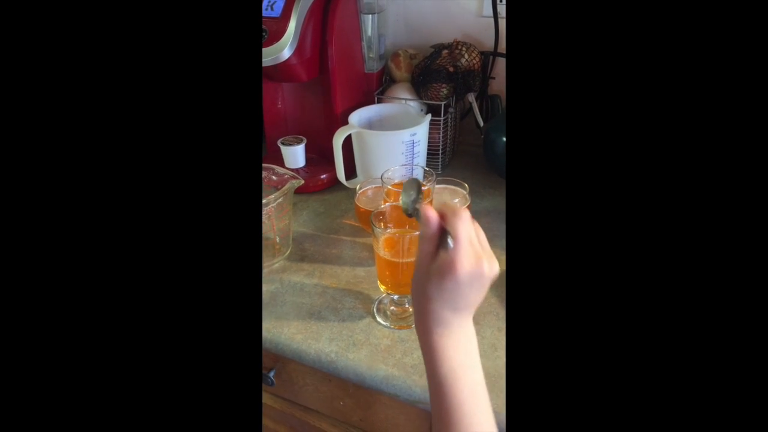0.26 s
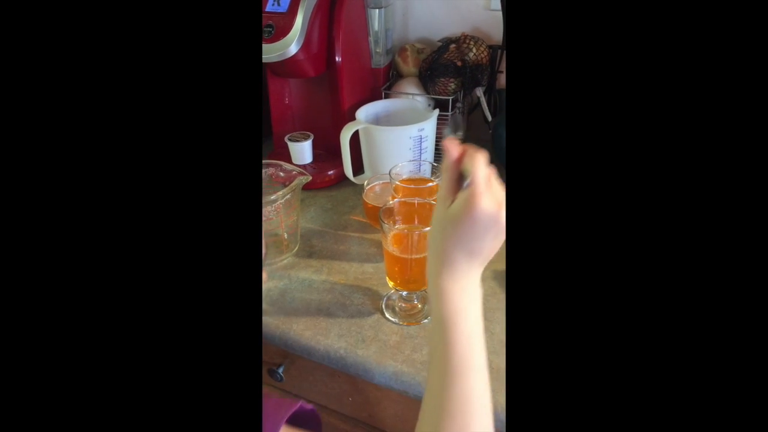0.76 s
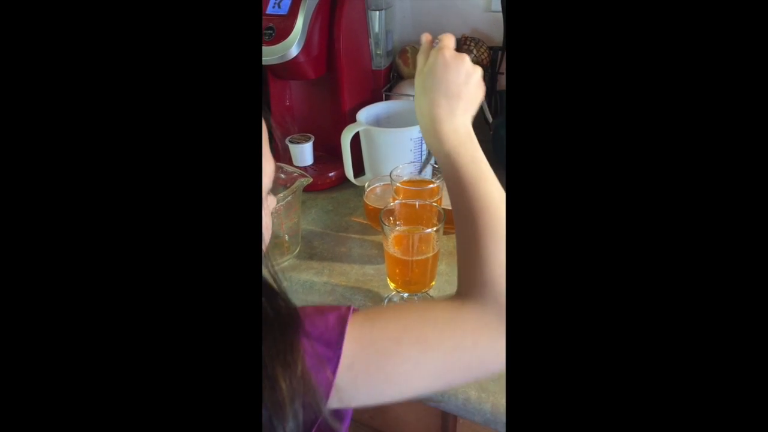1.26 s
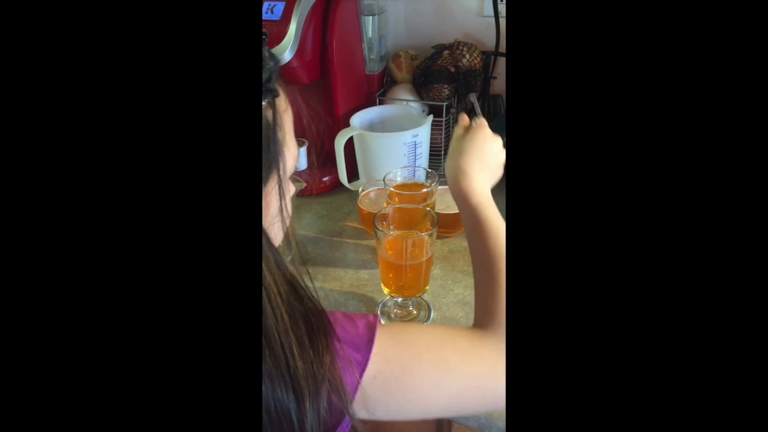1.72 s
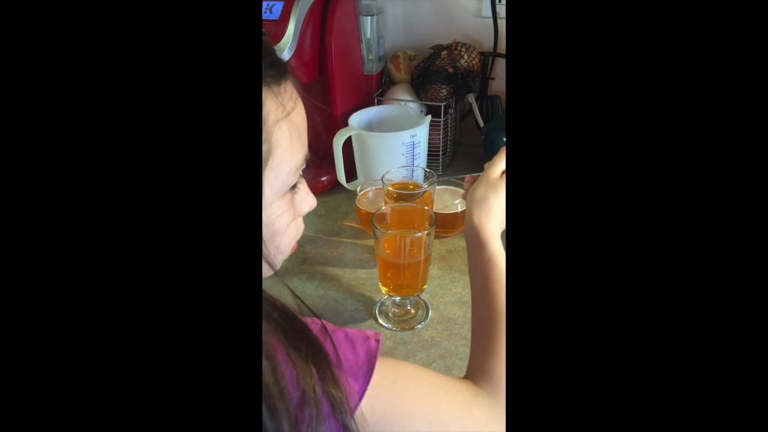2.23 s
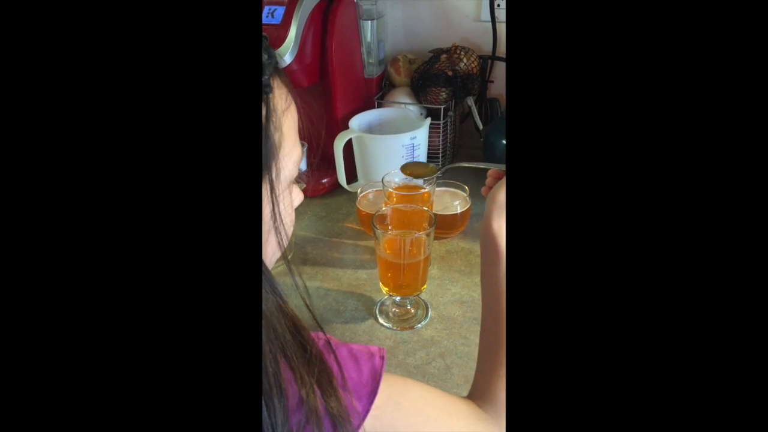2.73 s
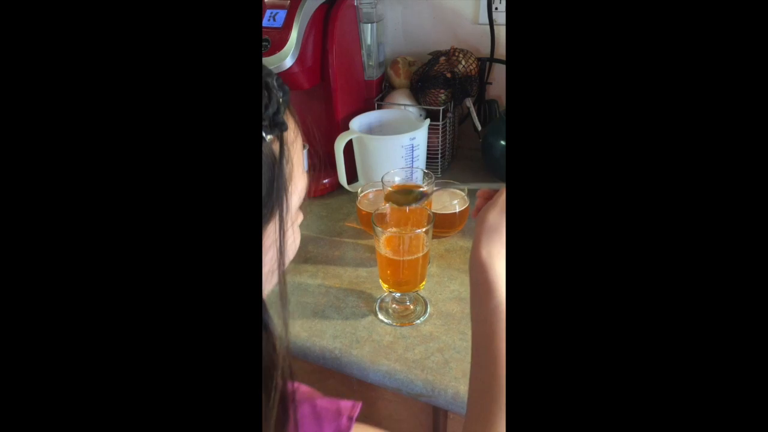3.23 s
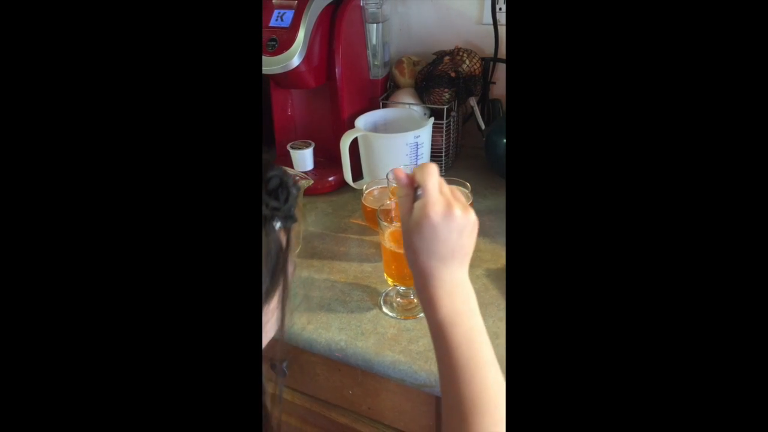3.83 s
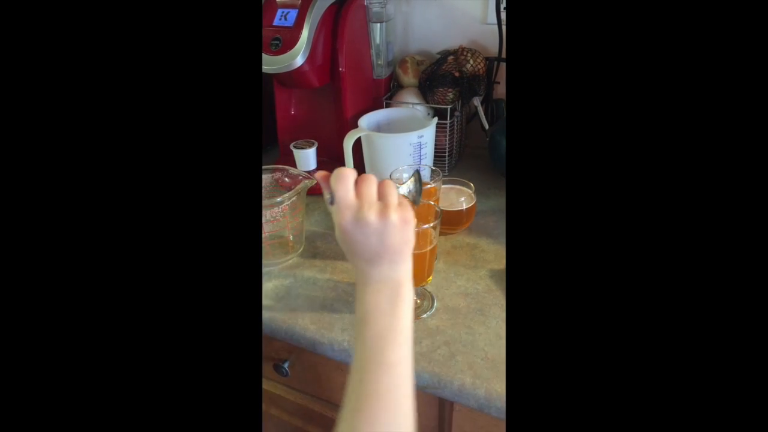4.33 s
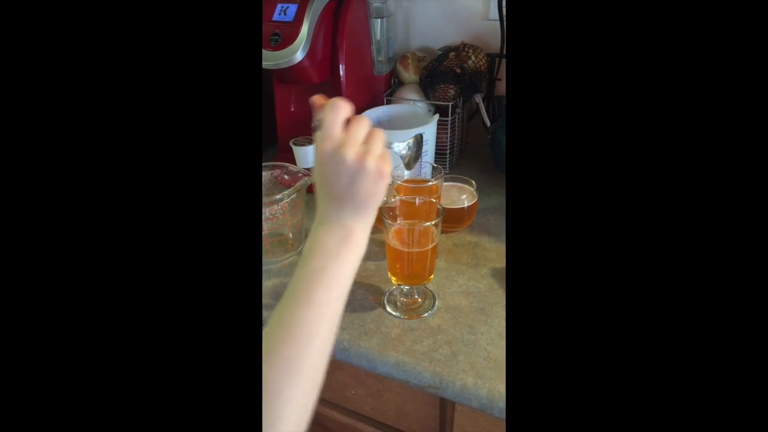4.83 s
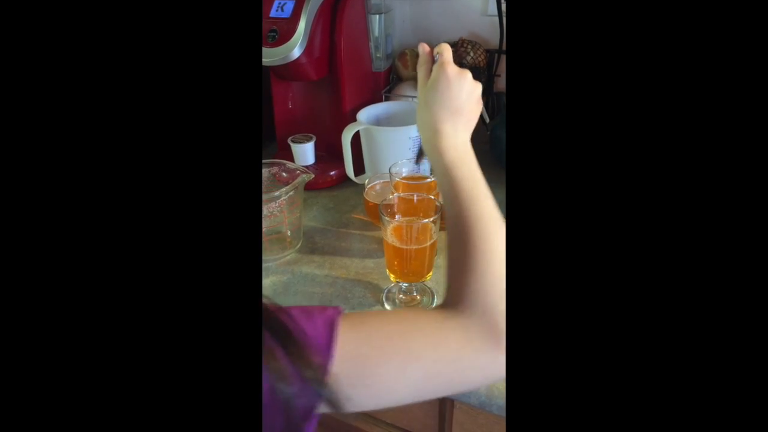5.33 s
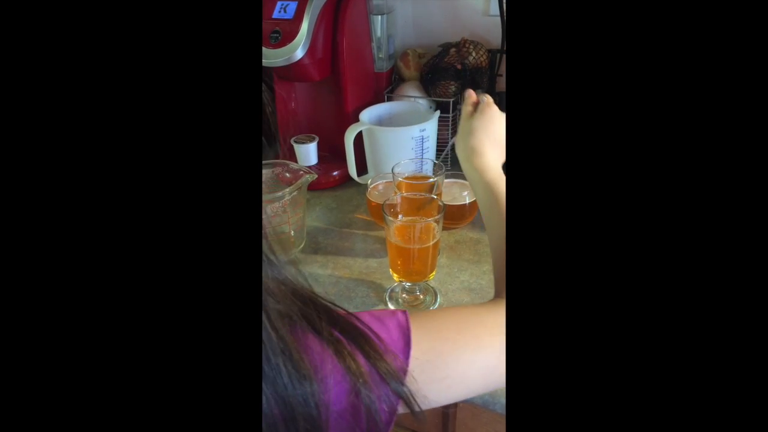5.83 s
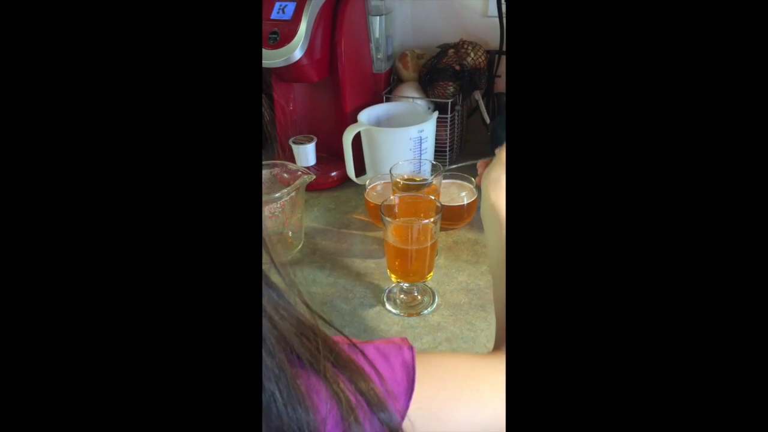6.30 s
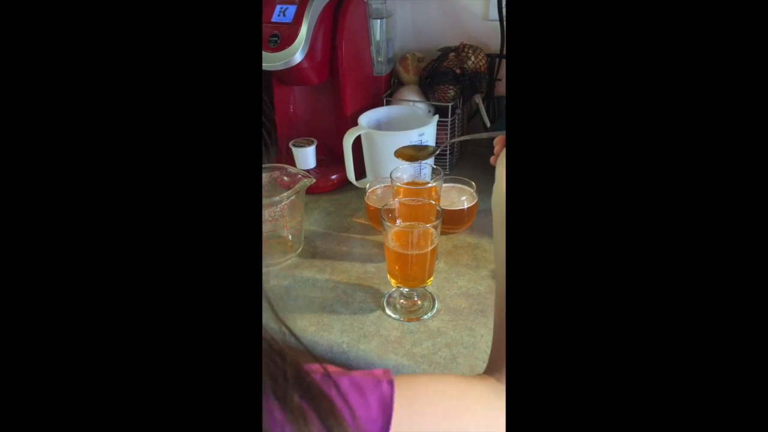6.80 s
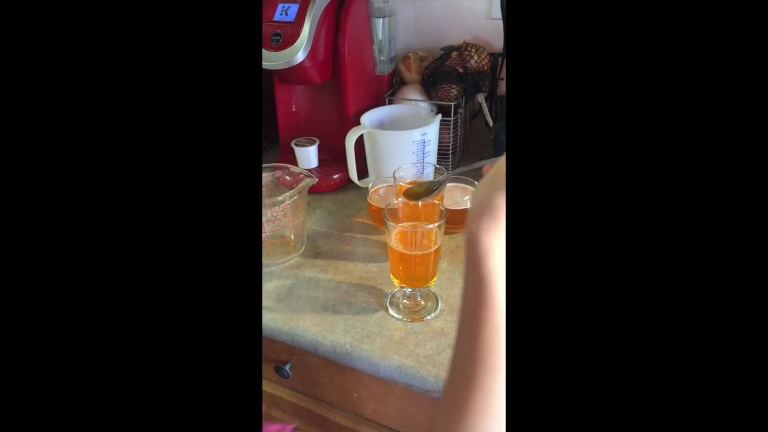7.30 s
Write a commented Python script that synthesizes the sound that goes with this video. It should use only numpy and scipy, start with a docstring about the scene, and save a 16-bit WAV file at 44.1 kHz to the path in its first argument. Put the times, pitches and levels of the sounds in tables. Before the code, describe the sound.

A metal spoon clinks in two bright, short bursts against glass goblets, with tiny liquid plips, a knock and low microphone-handling thumps in a quiet kitchen.

```python
"""Spoon in glass goblets of dessert

A metal spoon clinks on glass goblets of liquid dessert: noisy clacks excite short resonances, and
decaying sines ring as glass and spoon. Random slips rasp along the glass, short sines plip as bubbles,
a faint rim ring and a knock, and dull clacks slap the liquid. An arm brushes the counter, and the hand
that holds the microphone adds sagging low thumps and rumble over the shaped-noise hiss of a quiet,
small kitchen."""
import sys
import numpy as np
from scipy import signal
from scipy.fft import rfft, irfft
from scipy.io import wavfile

SR = 44100
rng = np.random.default_rng(int(sys.argv[2]) if len(sys.argv) > 2 else 0)


def store_pcm(level_fs):
    """Save levels as 16-bit WAV."""
    pcm = np.round(np.clip(level_fs, -1, 1) * 32767).astype(np.int16)
    wavfile.write(sys.argv[1], SR, np.atleast_2d(pcm).T)


N = 333162
TIME = np.arange(N) / SR   # scene clock [s]
AGE = np.arange(int(0.6 * SR)) / SR   # time since the start of one event [s]

# Spoon against the goblet wall: (time [s], ring level [dB], detuning [Hz], ring tilt [dB per octave],
# ring length [factor], clack level [dB], contact edge [Hz])
CLINKS = [ (1.509, -36, 8, 1.5, 0.87, -40, 17000), (1.59, -46.5, -50.5, -6, 1.47, -45.5, 9300),
          (1.701, -44.5, -60, -2.5, 0.4, -53, 3500), (1.922, -59.5, 77, 11.5, .68, -48.5, 3940),
          (1.983, -40.5, 1, -8, 1.73, -31.5, 5300), (2.235, -49.5, -20.5, .5, 0.47, -55.5, 2860),
          (2.513, -63, 20.5, 2, 0.84, -74, 3000), (5.643, -32.5, 42, -3, 0.8, -46, 12200),
          (5.685, -43, 79.5, -0.5, 0.77, -57.5, 6800), (5.750, -48, 32, -4, 0.38, -55.5, 7900),
          (6.054, -39, -1.5, -6, 1.02, -54, 3900), (6.118, -34.5, 3, -8.5, 0.35, -47, 6000),
          (6.256, -50, 20, -20, 2.23, -48.5, 3050), (6.446, -33.5, 5, 0, 0.76, -43, 4450)]
# Goblet damped by the spoon, lowest mode first: (frequency [Hz], level [dB], t60 at ring length 1 [s])
WALL_MODES = [(1625, -2.5, 0.17), (1730, -40, 0.039), (3279, -14.5, 0.18), (3417, 1, 0.13),
              (4310, -22, 0.17), (5720, -33.5, 0.18), (6330, -24, 0.24), (7870, -21, 0.092),
              (8750, -16.5, 0.26), (11450, -26.5, 0.088), (12400, -29, 0.068), (13300, -46, 0.029)]
# The spoon's own ring, damped by the hand: (frequency [Hz], level [dB], t60 [s])
SPOON_MODES = [(373, -13, 0.085), (609.5, -9.5, 0.064), (717, -7, 0.067), (959, 0.5, 0.063),
               (1420, -13, .11), (1980, 9, 0.041), (2000, -3.5, 0.17), (2223, -4, 0.03),
               (2630, -23.5, 0.12), (3430, 1, 0.067), (3680, -17, 0.048), (4550, -17, 0.14),
               (5730, -19, 0.13)]
# Spoon, stem and counter, crowded and short: (frequency [Hz], width [Hz], level [dB])
CLACK_BODY = [(359, 110, -7), (640, 142, -4), (806, 135, 4), (878, 182, 0.5), (1398, 690, 0.5),
              (1716, 312, 7), (2032, 94, 4.5), (2527, 320, -3), (3010, 98, -11.5), (3450, 102, 7),
              (3980, 1180, -12), (5776, 210, -0.5), (7030, 1500, -16), (9020, 580, -12), (13670, 930, -17)]
# Rim rings that go on freely: the first already sounding as the scene begins, the rest left by light # touches:
# (time [s], ring level [dB], ring tilt [dB per octave], clack level [dB], contact edge [Hz])
PINGS = [(0.0, -60, -9.5, -76, 2000), (3.738, -36, -0.5, -44, 8900), (3.803, -53, 3.5, -45, 7840),
         (4.029, -77, -18, -63.5, 2940)]
# Free rim: (frequency [Hz], level [dB], t60 [s])
RIM_MODES = [(1779, -2.5, 0.51), (1850, -13, 0.4), (3857, -2.5, 0.17), (6330, -18.5, 0.19),
             (7500, -36, 0.092), (9550, -18, 0.1), (13550, -37, 0.08)]
# Rim while the spoon still touches it: (frequency [Hz], width [Hz], level [dB])
PING_BODY = [(685, 360, -5.5), (1480, 480, -4), (1825, 174, 5.5), (4010, 166, -5), (6500, 360, -9.5),
             (7500, 430, -18), (9600, 230, -7), (13800, 1300, -40)]
UPPER_DETUNING = 0.7   # share of the detuning that the upper modes follow
SPOON_RING_DB = -6   # relative to the clack

# Spoon dragged along the glass: (time [s], length [s], rasp level [dB], singing rim level [dB])
SCRAPES = [(0.467, 0.33, -90, -74), (0.661, 0.27, -73, -78), (2.06, .24, -62, -78), (2.37, 0.11, -75, -88)]
# Goblet and spoon while they rub together: (frequency [Hz], width [Hz], level [dB])
SCRAPE_BODY = [(766, 150, -1.5), (1336, 110, -5.5), (1530, 18, 7), (1940, 90, 2), (3590, 76, -3)]
# The rim's note while it is rubbed: (frequency [Hz], width [Hz], level [dB])
SINGING_RIM = [(1712, 27, 0)]
# The spoon's edge catches and rings: (time [s], level [dB])
CATCHES = [(2.103, -62), (2.150, -56.5), (2.176, -58.5), (2.241, -53)]
SCRAPE_SKEW = 0.56   # under 1, a stroke swells faster than it fades

# Short plips and knock tones: bubbles, a faint rim ring (1800 Hz), and a knock at 7.41 s:
# (time [s], level [dB], pitch [Hz], life before it is cut off [s])
PLIPS = [(1.526, -50, 372, 0.019), (2.125, -53, 686, 0.05), (2.188, -51.5, 795, 0.048),
         (2.290, -62.5, 470, 0.057), (2.492, -59, 904, 0.041), (3.341, -34.5, 1930, 0.0043),
         (3.368, -23.5, 1590, 0.0093), (3.372, -49, 1800, 0.065), (3.462, -62, 1363, 0.045),
         (3.720, -36.5, 1280, .006), (3.721, -34.5, 1530, 0.0043), (5.683, -52, 953, 0.018),
         (6.258, -40, 824, 0.0073), (6.295, -55.5, 914, 0.18), (7.295, -58, 1360, 0.017),
         (7.414, -25.5, 1256, .001), (7.4145, -35, 1550, 0.0063), (7.415, -49, 3590, 0.0043),
         (7.416, -38.5, 1077, 0.038), (7.428, -53.5, 897, 0.028)]
# The spoon slaps into the liquid: (time [s], level [dB], contact edge [Hz])
SLAPS = [(3.369, -52.5, 1390), (3.719, -52.5, 1478), (7.310, -65, 990), (7.414, -45.5, 1450)]
PLIP_CYCLES = 235   # a tone left uncut would fall by 60 dB in this many cycles

# Arm and cloth brushing the counter: (time [s], level [dB])
BRUSHES = [(.38, -74), (1.87, -65), (6.67, -75), (6.93, -74.5), (7.24, -67), (7.47, -73)]
# Colour of the brushing, before scaling to unit rms: (frequency [Hz], level [dB per Hz])
BRUSH_COLOUR = [(100, -19), (220, -3.5), (330, -3.5), (450, -2.5), (620, -9.5), (1150, -14.5),
                (2000, -21.5), (5000, -50)]
BRUSH_ATTACK_S, BRUSH_FADE_DB_PER_S = 0.049, 29

# Fingers shifting on the microphone's case: (time [s], peak level [dB], starting pitch [Hz])
THUMPS = [(.347, -38.5, 272), (.353, -36.5, 122), (0.443, -45, 104), (.562, -36, 113), (0.679, -39, 204),
          (0.706, -37, 123), (.742, -38.5, 98), (1.255, -34.5, 206), (1.276, -30, 131), (1.39, -40.5, 126),
          (1.437, -42.5, 270), (1.448, -36, 120), (1.463, -41, 208), (1.74, -41, 254), (2.808, -48, 242),
          (2.874, -52.5, 104), (3.643, -49.5, 132), (3.687, -45, 129), (3.861, -45, 273), (4.455, -41, 166),
          (4.502, -41, 203), (4.846, -50.5, 235), (5.053, -52.5, 105), (5.441, -40, 163),
          (5.575, -43.5, 283), (5.586, -38.5, 120), (6.346, -32, 153), (6.701, -36, 161),
          (6.736, -43.5, 161), (7.275, -55.5, 243)]
# Rumble of the holding hand, before GRIP_LIFT_DB: (time [s], level [dB])
GRIP = [(0.0, -67.5), (0.67, -69), (1.01, -67.5), (1.26, -63.5), (2.44, -73.5), (5.49, -73), (6.45, -67.5),
        (7.55, -76)]
# Colour of the rumble, before scaling to unit rms: (frequency [Hz], level [dB per Hz])
GRIP_COLOUR = [(25, -30), (45, -0.5), (70, 2.5), (120, -5), (200, -16), (400, -30), (800, -62.5)]
THUMP_PEAK_CYCLES = 1.36   # cycles of the starting pitch until a thump peaks
STIR_DB, STIR_S = -23.5, 0.044   # rumble around each thump: level under its peak, spread in time
GRIP_LIFT_DB = 3.0
GRIP_WANDER_DB, GRIP_WANDERS_PER_S = 3.5, 12   # the rumble swells and sinks at random

# Colour of the hiss, before scaling to unit rms: (frequency [Hz], level [dB per Hz])
HISS = [(150, -13.5), (250, -5.5), (420, -8.5), (700, -8), (1400, -6.5), (2000, -6.5), (3100, -7.5),
        (4000, -14.5), (4750, -19), (5300, -16), (7500, -20.5), (10400, -24), (14800, -24.5), (15500, -41)]
HISS_DB = -73

# Counter, jug and backsplash: (delay [s], strength [gain])
ECHOES = [(.0031, 0.1), (.0068, 0.62), (0.011, 0.2)]
# Decay of the room: (frequency [Hz], t60 [s])
ROOM_T60 = [(200, .3), (1500, 0.23), (4000, 0.18), (12000, 0.22)]
# Round trips between the walls: (shortest [s], longest [s])
ROOM_DELAYS_S = (.007, .037)

MIC_LOW_CUT_HZ, CUTOFF_HZ = 23, 15600


def spoon_on_glass():
    """Clinks under a pressing spoon, which detunes and damps the wall, and pings of a free rim."""
    return clinks() + pings()


def clinks(ring_reach=1.32, choke_s=0.003):
    """Each blow is a clack and a ring; a soft contact dulls both."""
    out = np.zeros(N)
    next_touches = [row[0] for row in CLINKS[1:]] + [N / SR]
    for row, next_s in zip(CLINKS, next_touches):
        s, ring_db, detuning_hz, tilt_db, length, clack_db, edge_hz = row
        free = (1 - np.tanh((s + AGE - next_s) / choke_s)) / 2   # the next touch chokes the wall
        upper_hz = UPPER_DETUNING * detuning_hz
        wall = struck(WALL_MODES, s, tilt_db, length, detuning_hz, upper_hz)
        spoon = struck(SPOON_MODES, s)
        ring = from_db(ring_db) * wall * free + from_db(clack_db + SPOON_RING_DB) * spoon
        for _ in range(2):
            ring = lowpass(ring, ring_reach * edge_hz)
        add(out, s, ring + from_db(clack_db) * clack(edge_hz))
    return out


def pings():
    """A light touch makes a small clack and lets the rim ring on undamped."""
    out = np.zeros(N)
    for s, ring_db, tilt_db, clack_db, edge_hz in PINGS:
        rim = from_db(ring_db) * struck(RIM_MODES, s, tilt_db, waver=0.003)
        add(out, s, rim + from_db(clack_db) * clack(edge_hz, PING_BODY))
    return out


def struck(modes, s, tilt_db=0, length=1, low_shift_hz=0, upper_shift_hz=0,
           rise_s=0.0016, waver=0.0031, waver_hz=70):
    """Ringing modes as decaying sines; a positive tilt favours the treble, as a harder blow does."""
    out = 0
    clock = AGE + round(s * SR) / SR   # phase runs on the scene clock, not from each blow
    for k, (hz, db, t60) in enumerate(modes):
        octaves_up = np.log2(hz / modes[0][0])
        shift_hz = upper_shift_hz if k else low_shift_hz
        cycles = (hz + shift_hz) * clock
        if k:   # the trembling contact makes the upper modes waver in pitch
            tremble = rms_one(lowpass(rng.standard_normal(len(AGE)), waver_hz))
            cycles = cycles + np.cumsum(hz * waver * tremble) / SR
        level = from_db(db + tilt_db * octaves_up)
        out = out + level * np.sin(2 * np.pi * cycles) * dying(t60 * length)
    return out * (1 - np.exp(-AGE / rise_s))


def clack(edge_hz, resonances=CLACK_BODY, chatter_t60=0.098, first_touch=1.6):
    """A first touch, then a dying chatter of tiny contacts; a softer contact has a lower edge."""
    force = rng.standard_normal(len(AGE)) * dying(chatter_t60)
    force[0] = first_touch
    sound = body(lowpass(force, edge_hz), resonances)
    return sound / np.sqrt(np.sum(sound ** 2) / (0.01 * SR))   # energy of 10 ms at unit rms


def body(force, resonances):
    """Contact force through short resonances, in parallel with alternating signs."""
    out = 0
    for k, (hz, width, db) in enumerate(resonances):
        radius = np.exp(-np.pi * width / SR)
        poles = [1, -2 * radius * np.cos(2 * np.pi * hz / SR), radius ** 2]
        band = signal.lfilter([1, 0, -1], poles, force) * (1 - radius ** 2) / 2
        out = out + (-1) ** k * from_db(db) * band
    return out


def scraping(slips_per_s=220, spread_db=4, catch_edge_hz=2400):
    """Uneven slips of the spoon's edge rasp and make the rim sing faintly; a catch rings the spoon."""
    slipping = rng.random(N) < slips_per_s / SR
    slips = slipping * from_db(spread_db * rng.standard_normal(N)) + 1e-18
    rasp = rms_one(body(slips, SCRAPE_BODY))
    song = rms_one(body(slips, SINGING_RIM))
    out = np.zeros(N)
    for s, length, rasp_db, song_db in SCRAPES:
        progress = np.clip((TIME - s) / length, 0, 1)
        pressure = np.sin(np.pi * progress ** SCRAPE_SKEW) ** 2
        out += pressure * (from_db(rasp_db) * rasp + from_db(song_db) * song)
    for s, db in CATCHES:
        add(out, s, from_db(db) * lowpass(struck(SPOON_MODES, s), catch_edge_hz))
    return out


def plips_and_slaps(rise_s=0.0014, cut_s=0.0025):
    """Each plip or knock tone is one sine, cut off after its life; a slap is a dull clack."""
    out = np.zeros(N)
    for s, db, hz, life in PLIPS:
        rise = 1 - np.exp(-AGE / rise_s)
        uncut = (1 - np.tanh((AGE - life) / (2 * cut_s))) / 2   # a bubble's burst
        tone = np.sin(2 * np.pi * hz * AGE) * dying(PLIP_CYCLES / hz)   # higher tones decay sooner
        add(out, s, from_db(db) * tone * rise * uncut)
    for s, db, edge_hz in SLAPS:
        add(out, s, from_db(db) * clack(edge_hz, chatter_t60=0.034))
    return out


def kitchen(x, tail_db=-11):
    """Direct sound, near echoes, and round trips between the walls in which the bass lasts longest."""
    hz = np.fft.rfftfreq(len(AGE), 1 / SR)
    turn = -2j * np.pi * hz   # phase turn per second of delay
    tail = 0
    for k, delay in enumerate(np.geomspace(*ROOM_DELAYS_S, 12)):
        trip = np.exp(turn * delay - np.log(1000) * delay / at_hz(ROOM_T60, hz))
        tail = tail + (-1) ** k * trip / (1 - trip)   # endless repeats of one trip
    for delay in (0.0011, 0.0019, 0.0029):   # clutter smears each reflection: all-passes [s]
        step = np.exp(turn * delay)
        tail = tail * (step - 0.5) / (1 - 0.5 * step)
    tail = tail / np.sqrt(np.mean(np.abs(tail) ** 2))
    response = from_db(tail_db) * irfft(tail, len(AGE))
    response[0] += 1
    for delay, strength in ECHOES:
        response[round(delay * SR)] += strength
    return signal.fftconvolve(x, response)[:N]


def handling():
    """Finger thumps and the rumble of the hand, both carried by the microphone's case."""
    return finger_thumps() + hand_rumble()


def finger_thumps(sag=0.73, sag_peaks=2.365):
    """A sine swells and dies within a few cycles, sinking in pitch as the finger settles."""
    out = np.zeros(N)
    for s, db, hz in THUMPS:
        peak_s = THUMP_PEAK_CYCLES / hz
        progress = AGE / peak_s
        swell = (progress * np.exp(1 - progress)) ** 2
        pitch = hz * (1 - sag * (1 - np.exp(-progress / sag_peaks)))
        add(out, s, from_db(db) * swell * np.sin(2 * np.pi * np.cumsum(pitch) / SR))
    return out


def hand_rumble():
    """Low noise follows the grip, wanders at random and is stirred up around each thump's peak."""
    grip_db = np.interp(TIME, *np.transpose(GRIP)) + GRIP_LIFT_DB
    power = from_db(grip_db) ** 2
    for s, db, hz in THUMPS:
        peak_time = s + THUMP_PEAK_CYCLES / hz
        power += from_db(db + STIR_DB) ** 2 * np.exp(-np.abs(TIME - peak_time) / STIR_S)
    wander = from_db(GRIP_WANDER_DB * drift(GRIP_WANDERS_PER_S))
    return np.sqrt(power) * coloured_noise(GRIP_COLOUR) * wander


def brushing():
    """Each move of the arm starts a soft, dull rub of noise that fades slowly."""
    power = 0
    for s, db in BRUSHES:
        attack = np.clip((TIME - s) / BRUSH_ATTACK_S, 0, 1)
        fade_db = BRUSH_FADE_DB_PER_S * np.maximum(TIME - s - BRUSH_ATTACK_S, 0)
        power = power + (attack * from_db(db - fade_db)) ** 2
    return np.sqrt(power) * coloured_noise(BRUSH_COLOUR)


def kitchen_hiss():
    """The quiet room as steady coloured noise."""
    return from_db(HISS_DB) * coloured_noise(HISS)


def coloured_noise(spectrum):
    """Steady noise of a given colour, rms 1."""
    hz = np.arange(N // 2 + 1) * SR / N
    white = rfft(rng.standard_normal(N))
    return rms_one(irfft(white * from_db(at_hz(spectrum, hz)), N))


def drift(per_s):
    """Slow random wander, straight lines between random points of spread 1."""
    knots = rng.standard_normal(1000)
    return np.interp(TIME * per_s, np.arange(len(knots)), knots)


def dying(t60):
    """Exponential decay over one event, 60 dB down after t60 seconds."""
    return np.exp(-np.log(1000) * AGE / t60)


def lowpass(x, edge_hz):
    """Second-order low-pass, its edge kept below half the sample rate."""
    edge_hz = min(edge_hz, SR / 2 - 1000)
    return signal.sosfilt(signal.butter(2, edge_hz, fs=SR, output="sos"), x)


def from_db(db):
    """Decibels to gain."""
    return 10 ** (np.asarray(db) / 20)


def rms_one(x):
    """Scale to unit rms."""
    return x / np.sqrt(np.mean(x ** 2) + 1e-20)


def at_hz(points, hz):
    """Read a table on a log-frequency axis."""
    known_hz, values = np.transpose(points)
    return np.interp(np.log(np.maximum(hz, 1)), np.log(known_hz), values)


def add(track, s, sound):
    """Mix a sound into a track from a given time."""
    start = max(round(s * SR), 0)
    track[start:start + len(sound)] += sound[:N - start]


def scene():
    """Glass and liquid sound in the room; brushing, handling and hiss join without its echoes."""
    counter = kitchen(spoon_on_glass() + scraping() + plips_and_slaps())
    mix = counter + handling() + brushing() + kitchen_hiss()
    return mix[None]   # one channel


def record(dry):
    """The small microphone loses the deepest bass; the top is cut steeply."""
    low_cut = signal.butter(3, MIC_LOW_CUT_HZ, "high", fs=SR, output="sos")
    top_cut = signal.ellip(10, 0.1, 70, CUTOFF_HZ, fs=SR, output="sos")
    return signal.sosfilt(top_cut, signal.sosfilt(low_cut, dry))


dry = scene()
out = record(dry)
store_pcm(out)
```